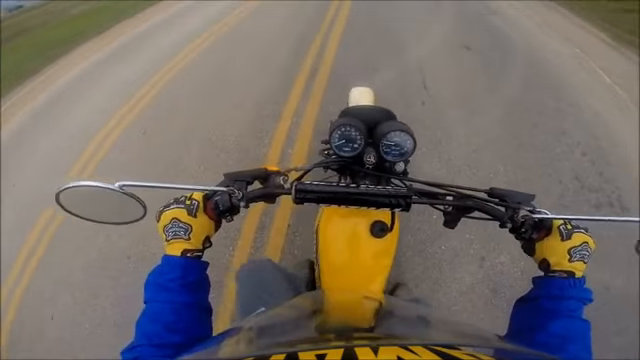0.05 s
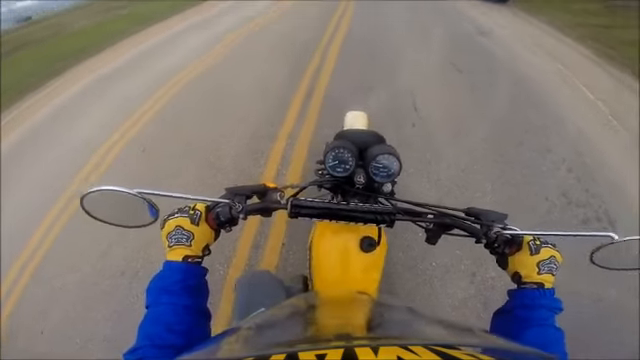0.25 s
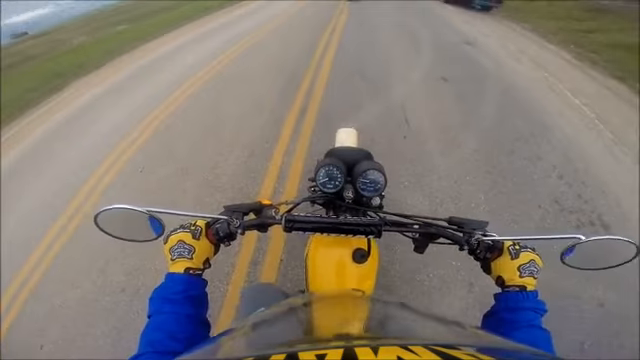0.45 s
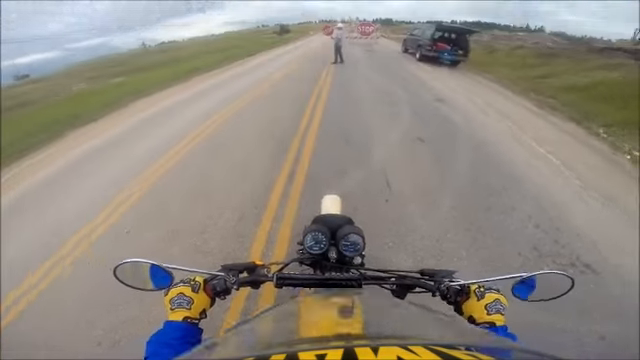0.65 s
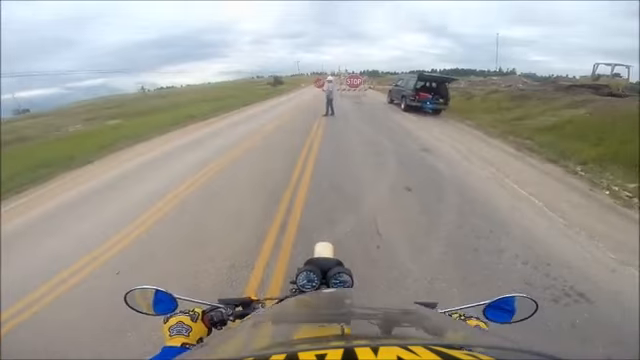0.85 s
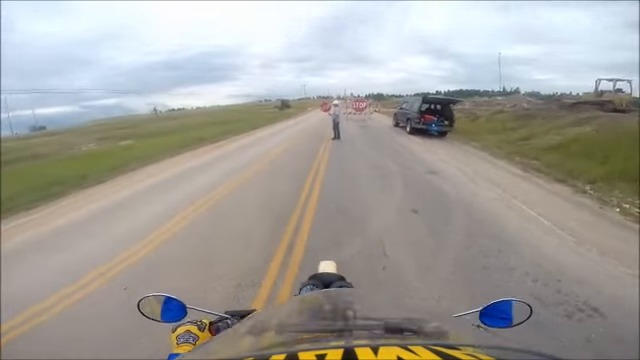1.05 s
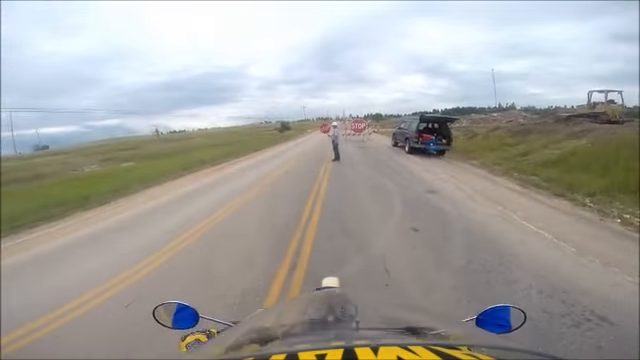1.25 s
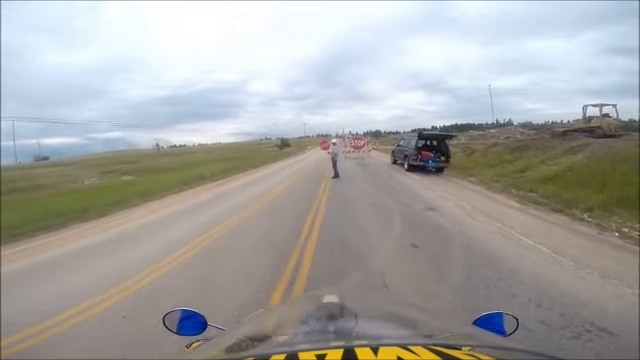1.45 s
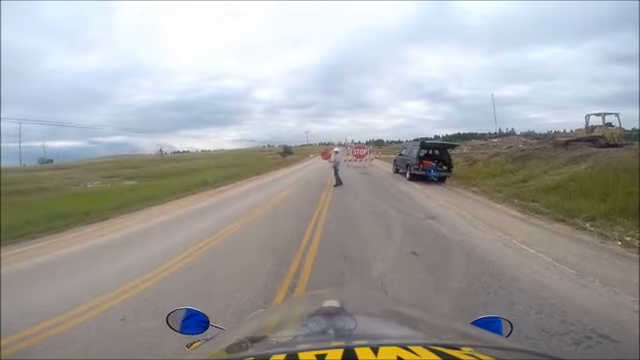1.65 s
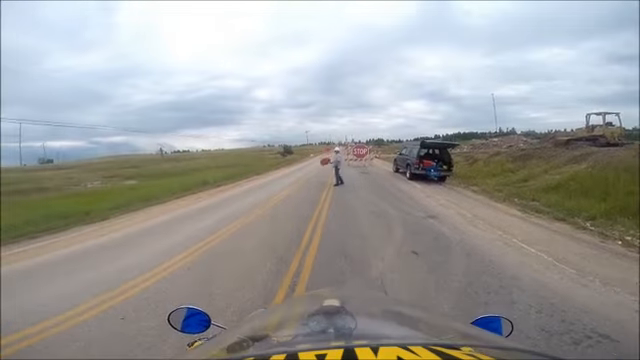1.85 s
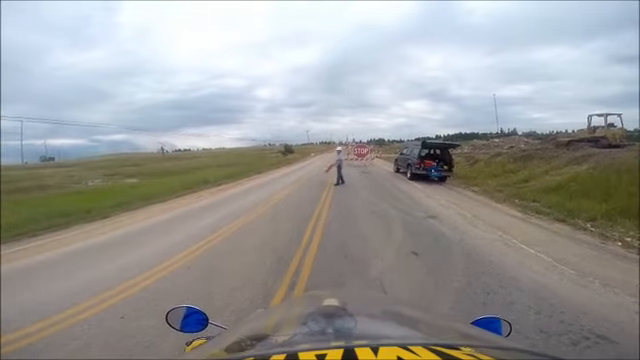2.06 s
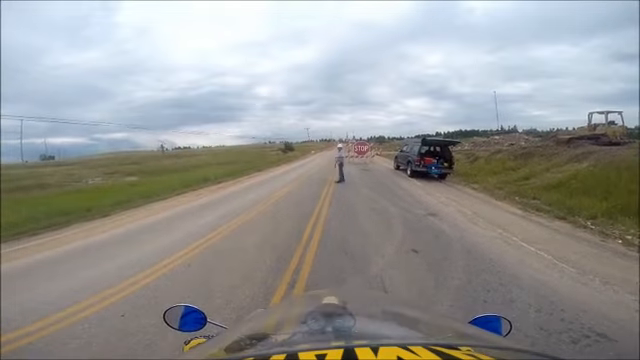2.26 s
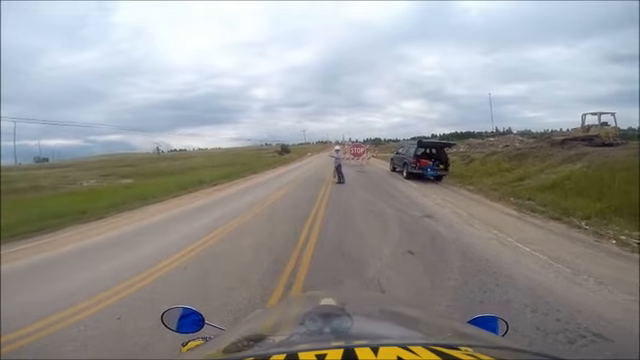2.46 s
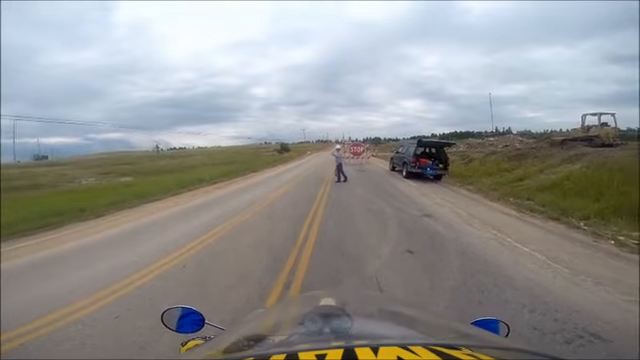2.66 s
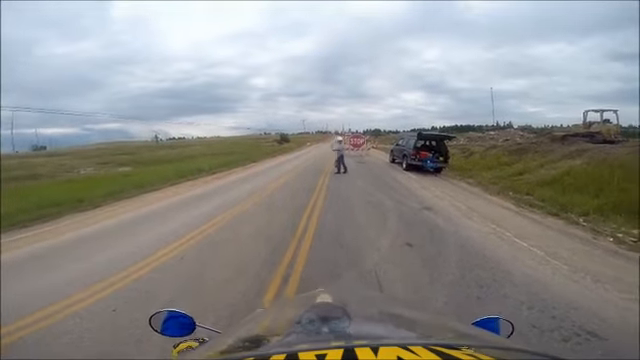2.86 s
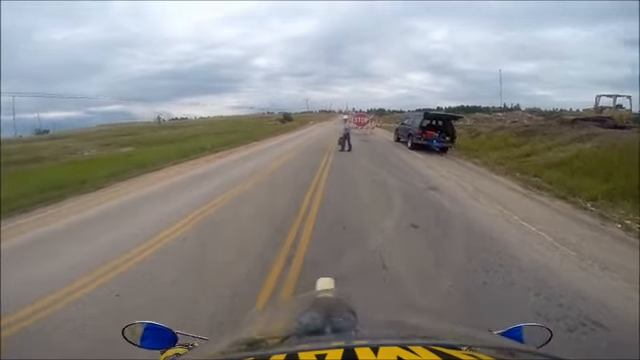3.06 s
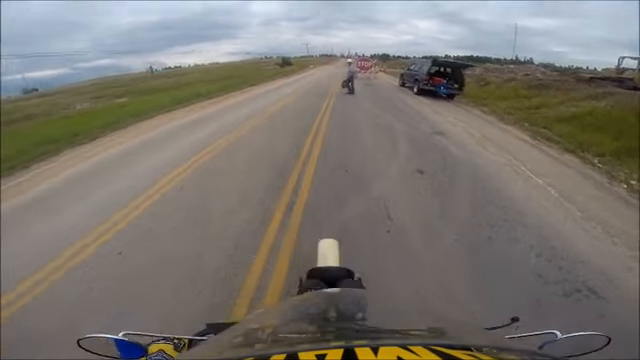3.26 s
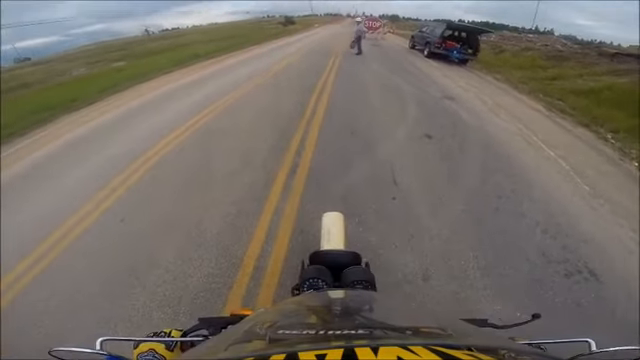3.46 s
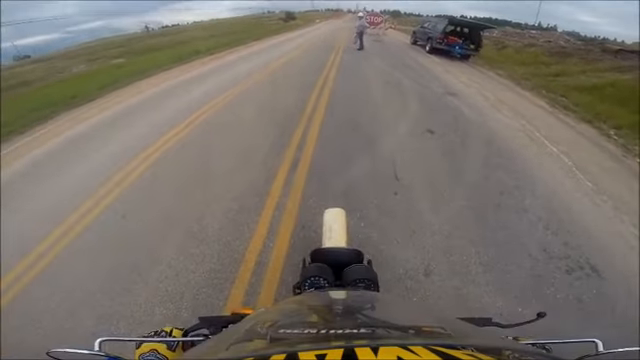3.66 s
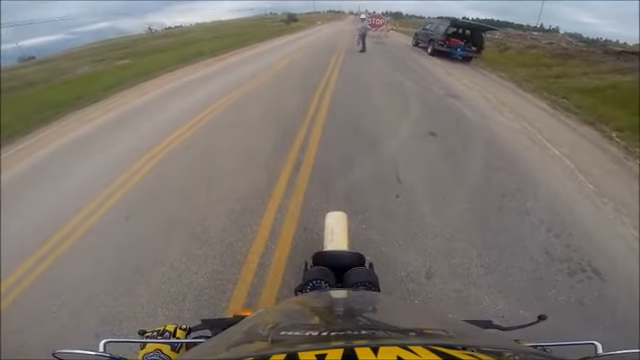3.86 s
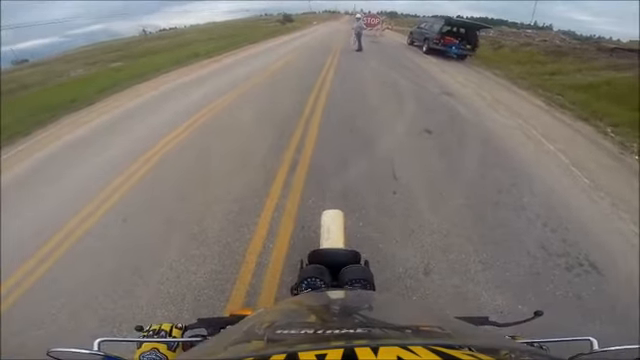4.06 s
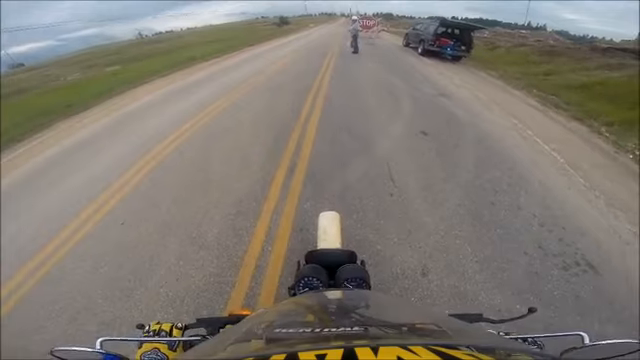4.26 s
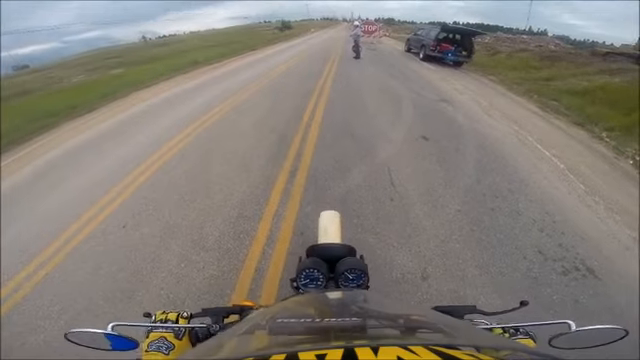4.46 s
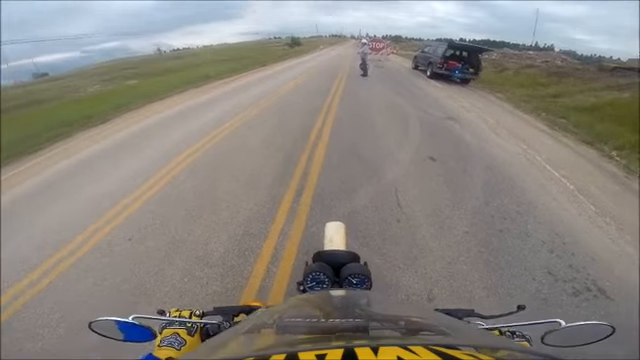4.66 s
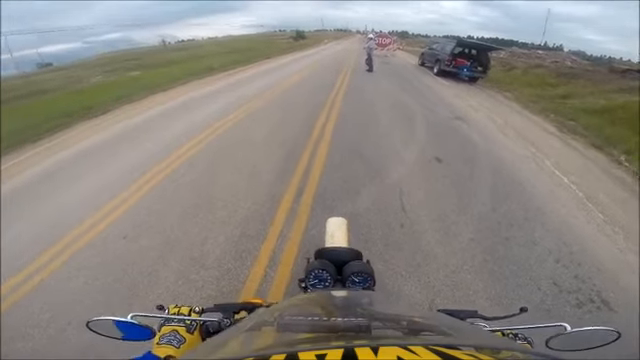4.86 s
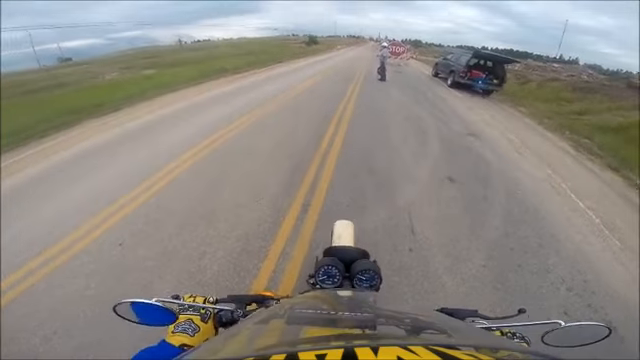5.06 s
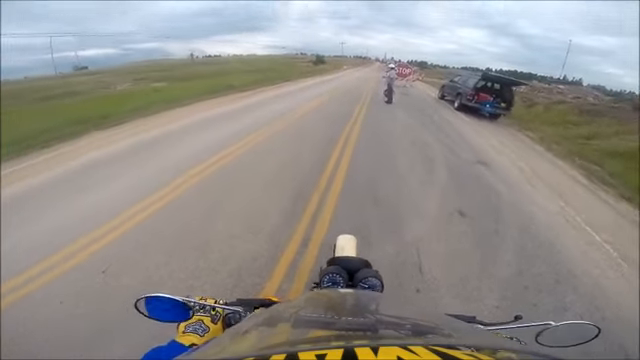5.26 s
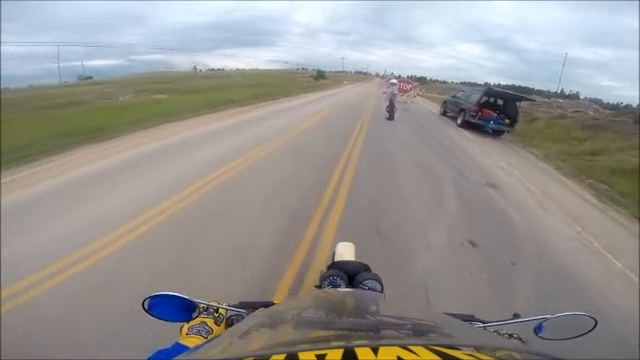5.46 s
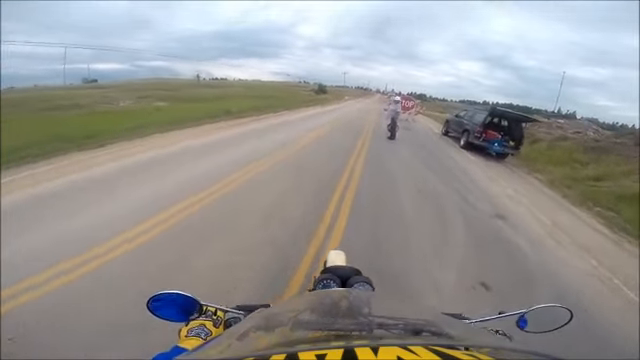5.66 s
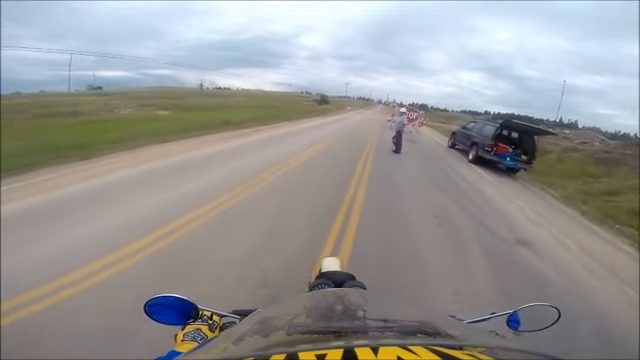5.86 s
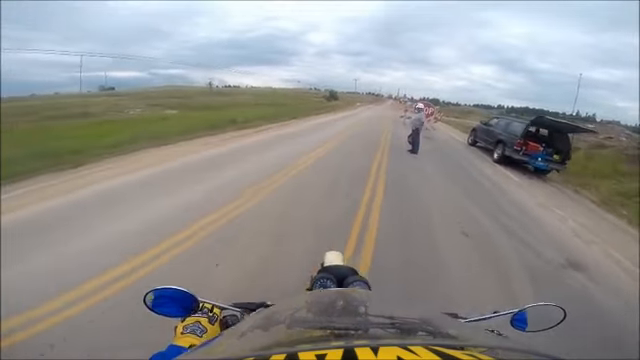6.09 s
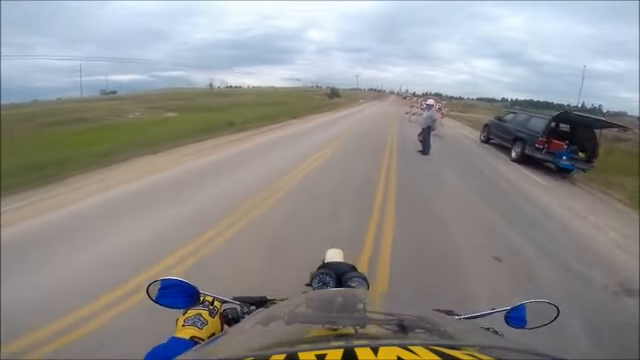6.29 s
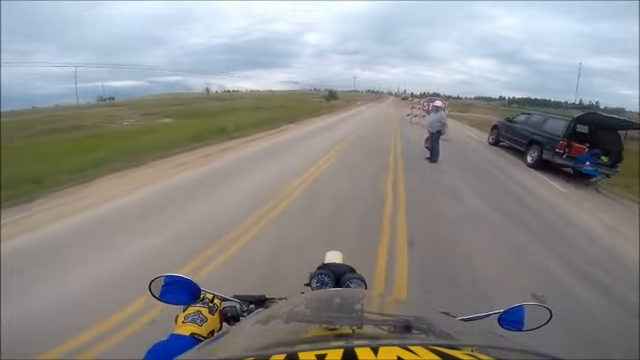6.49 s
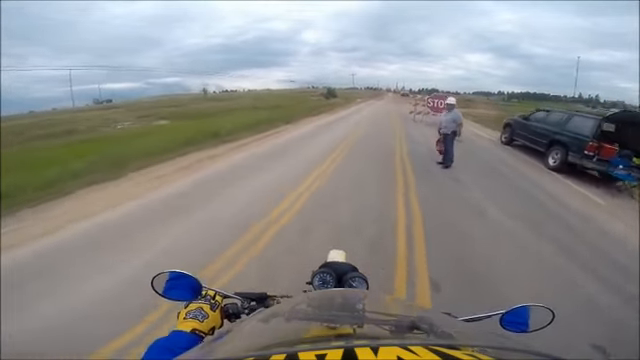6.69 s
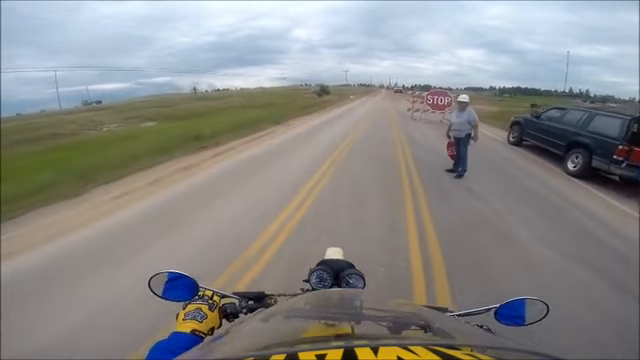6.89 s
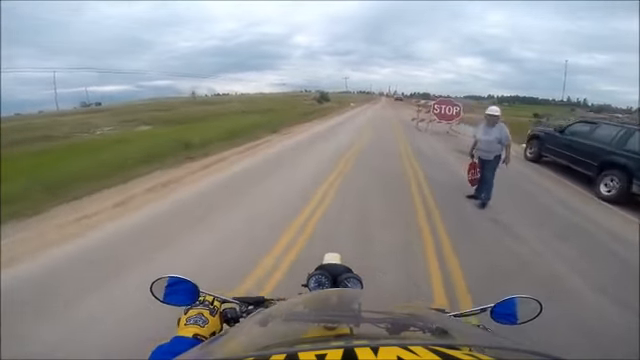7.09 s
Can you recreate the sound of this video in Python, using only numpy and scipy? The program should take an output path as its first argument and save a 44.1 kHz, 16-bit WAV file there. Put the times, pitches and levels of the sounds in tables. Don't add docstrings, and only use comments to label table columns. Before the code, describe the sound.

From a rider's helmet, a two-stroke motorbike putters irregularly at idle, blips up, sags as the clutch bites, and accelerates into a metallic rasp.

```python
import sys
import numpy as np
from scipy import signal
from scipy.fft import rfft, irfft
from scipy.io import wavfile
from scipy.ndimage import uniform_filter1d

SR = 44100
rng = np.random.default_rng(int(sys.argv[2]) if len(sys.argv) > 2 else 0)


def convert_level_to_amplitude(level_db):
    exponent = np.asarray(level_db, float) / 20
    return 10 ** exponent


def to_wav(sig):
    pcm = np.clip(np.atleast_2d(sig), -1, 1) * 32767
    pcm = np.round(pcm).astype(np.int16)
    wavfile.write(sys.argv[1], SR, pcm.T)


N = 314433


def level(x, db):
    return x * convert_level_to_amplitude(db) / np.sqrt(np.mean(x ** 2))


def curves(table):
    s, *columns = np.transpose(table)
    return [np.interp(np.arange(N) / SR, s, c) for c in columns]


def noise(points):
    hz, db = np.transpose(points)
    bins_hz = np.fft.rfftfreq(N, 1 / SR)
    gain = convert_level_to_amplitude(np.interp(np.log(bins_hz + 1), np.log(hz), db))
    return level(irfft(rfft(rng.standard_normal(N)) * gain, N), 0)


def ring(x, hz, width_hz):
    return signal.lfilter(*signal.iirpeak(hz, hz / width_hz, fs=SR), x)


def split(x, hz, kind):
    return signal.sosfilt(signal.butter(4, hz, kind, fs=SR, output="sos"), x)


def swell(at, size, rise_s, fall_s):
    poles = np.exp(-(np.arange(3) / rise_s + 1 / fall_s) / SR)
    sections = [[1, 0, 0, 1, -p, 0] for p in poles]
    jumps = np.bincount(at, size, N)[:N] + 1e-18
    peak = signal.sosfilt(sections, signal.unit_impulse(SR // 10)).max()
    return signal.sosfilt(sections, jumps) / peak


def walk(rate_hz):
    k = int(SR / rate_hz)
    return level(uniform_filter1d(uniform_filter1d(rng.standard_normal(N), k), k), 0)


def even(x):
    return level(x / np.sqrt(uniform_filter1d(x ** 2, SR // 8) + .1), 0)


def bell(at_s, length_s):
    return ((np.arange(N) / SR - at_s) / length_s) ** 2


# start_s, load_state (0 idle, 1 light load, 2 full load)
LOAD_STATE = [
    (4.0, 0),
    (4.3, 1),
    (5.7, 1),
    (6.1, 2),
    (7.13, 2),
]


def share(state):
    return np.clip(1 - abs(curves(LOAD_STATE)[0] - state), 0, 1)


# start_s, rate_turns_per_s
CRANK_SPEED = [(0, 27), (.6, 26), (3.6, 24.8), (3.9, 28.4), (4.04, 32.5), (4.2, 44.2), (4.39, 54.4),
               (4.5, 57.7), (4.69, 50.4), (4.93, 44.8), (5.11, 33.3), (5.23, 30.2), (5.49, 33.0),
               (5.84, 32.3), (6.18, 39.3), (6.54, 43.7), (6.68, 45.0), (7.13, 52.1)]
# start_s, peak_db
CRANK_MARKS = [(5.1405, -47.5), (5.5827, -67), (5.765, -51), (6.3653, -51), (6.5532, -34)]


def crank():
    hz, = curves(CRANK_SPEED)
    firing_s = np.array([row[0] - .003 for row in IDLE_BANGS + REVVED_BANGS + CRANK_MARKS])
    turns = np.cumsum(hz) / SR
    seen = turns[(firing_s * SR).astype(int)]
    whole = np.cumsum(np.round(np.diff(seen, prepend=seen[0] - 2)))
    return hz, turns + np.interp(np.arange(N) / SR, firing_s, whole - seen)


def engine():
    hz, turns = crank()
    at = np.flatnonzero(np.diff(np.floor(turns)) > 0)
    thump, bangs = lone_firings(hz)
    hollow = convert_level_to_amplitude(29.5) * chamber(puffs(at, hz) + thump, hz)
    return hollow + bangs + steady_firing(at) + frame_shake(turns, hz)


PUFF_LEVEL = [-50, -44.5, -42.5]


def puffs(at, hz):
    puff_db = sum(db * share(state) for state, db in enumerate(PUFF_LEVEL))
    puff_db = puff_db + 0.56 * (hz - 42) * share(2.3)
    push = swell(at, convert_level_to_amplitude(puff_db[at] + 0.11 * rng.standard_normal(len(at))), 0.000081, 0.00033)
    flutter = swell(at, np.full(len(at), convert_level_to_amplitude(-66.5)), 0.0044, 0.048) * rng.standard_normal(N)
    return push + flutter * (0.6 + 0.42 * share(0))


# pitch_hz, width_hz, idle_db, light_load_db, full_load_db
CHAMBER_MODES = [(92.8, 13, -11.5, -6, -18), (119, 34, -23, -11, -13), (224, 21, -8, 0, -2),
                 (263, 57.5, -7, -23, -3), (325.9, 41, -0.5, 1.5, 4), (428, 21, -21, -4, -9),
                 (483.5, 19.6, -13.5, -8, -7.5), (635, 20.3, -10, -1, -9), (727.7, 26.4, -13.5, -7.5, -10),
                 (985, 8.5, -16, -1.5, -4.5), (780, 780, -28.5, -19, -29)]


def chamber(push, hz):
    hot = np.clip((hz - 31.5) / 6.8, 0, 1)
    idle = share(0)
    pushes = [push * idle, push * (1 - idle) * (1 - hot), push * (1 - idle) * hot]
    out = 0
    for k, (mode_hz, width_hz, *dbs) in enumerate(CHAMBER_MODES):
        drive = sum(convert_level_to_amplitude(db) * p for db, p in zip(dbs, pushes))
        out = out + (-1) ** k * ring(drive, mode_hz, width_hz)
    return out


def frame_shake(turns, hz):
    shake_db = np.minimum(-51.5 + 19 * np.log2(hz / 42), -51.5)
    judder_db = 14.5 * np.exp(-bell(5.2, .3))
    return convert_level_to_amplitude(shake_db + judder_db + 3.5) * np.sin(2 * np.pi * turns)


# pitch_hz, width_hz, lone_firing_db, light_load_db, full_load_db
METAL_RINGS = [(1079.6, 19, -1, -47, -40), (1229, 10.5, -6, -21, -8.5), (1501, 13, 3.5, -7, -7),
               (1630, 45, -2, -5.5, -10.5), (1940, 12, -11.5, -37, -50), (2057, 15, -5.5, -8, -8),
               (2372, 13, -9.5, -7, -8), (2690, 4.3, -25, -4, -36), (2820, 11, -8.5, -35, -18),
               (2820, 54, -16, -16.5, -16), (3264, 41, -11, -11.5, -42), (3245, 28, -13, -12.5, -32),
               (3938, 46, -22.5, -16.5, -13), (4743, 63, -19, -22, -20), (5500, 16, -49, -16.5, -25),
               (6300, 480, -25, -26, -24), (6390, 230, -32, -31, -30)]


def metal(shake, column):
    return sum((-1) ** k * convert_level_to_amplitude(m[column]) * ring(shake, m[0], m[1]) for k, m in enumerate(METAL_RINGS))


# pitch_hz, level_db (per Hz)
GAS_COLOUR = [(290, -11), (500, -1), (922, -5), (1050, 1), (1300, -3), (1610, 0), (2200, -10.5), (2760, -4),
              (3560, -11), (6390, -25.5), (15000, -44.5)]


def sizzle(envelope, low_hz=4000):
    high_pass = signal.butter(2, low_hz, "high", fs=SR, output="sos")
    return envelope * signal.sosfilt(high_pass, noise(GAS_COLOUR))


# start_s, peak_db, crack_db
IDLE_BANGS = [(0.055, -27, -30), (0.2015, -28, -35), (0.3513, -36.5, -49), (0.5012, -31, -62),
              (0.6173, -37, -54), (0.7726, -32, -37.5), (0.8892, -48, -66), (0.9689, -36, -60),
              (1.0865, -33, -57), (1.2031, -30.5, -47), (1.3872, -39.5, -66), (1.506, -33, -46),
              (1.6604, -29.5, -43), (1.806, -37, -71), (1.9268, -38, -75), (2.043, -33, -44),
              (2.2763, -35.5, -57), (2.476, -41.5, -68), (2.5883, -41.5, -78), (2.7121, -31, -62),
              (2.8783, -44.5, -82), (2.9985, -29.5, -64), (3.1504, -40.5, -68)]
# start_s, peak_db, crack_db
REVVED_BANGS = [(3.439, -30.5, -42), (3.5989, -28.5, -33.5), (3.7528, -29.5, -31.5), (3.859, -29.5, -43),
                (3.962, -29.5, -34.5), (4.026, -25, -29.5), (4.0838, -28.5, -29), (4.134, -28, -28),
                (4.1839, -24, -25), (4.2494, -24.5, -27), (4.3309, -25.5, -27), (4.4236, -26.5, -31),
                (4.5111, -27, -31), (4.6012, -26, -28), (4.6984, -26, -28.5), (4.78, -24, -27.5),
                (4.8643, -28, -37.5), (4.93, -28.5, -40)]
# rate_turns_per_s, level_db
SECOND_BANG = [(43.5, -29), (45.5, -9.5), (55, 0)]
# pitch_hz, width_hz, level_db
STRUCK_FINS = [(2635, 17, -1.5), (2753, 25, 0), (2920, 27, -6)]


def lone_firings(hz):
    s, peak_db, crack_db = np.transpose(IDLE_BANGS + REVVED_BANGS)
    first = ((s - .003) * SR).astype(int)
    again_db = np.interp(hz[first], *np.transpose(SECOND_BANG))
    both = np.r_[first, first + (SR / hz[first]).astype(int)]

    def burst(db, gain_db, rise_s, fall_s):
        return swell(both, convert_level_to_amplitude(np.r_[db, db + again_db] + gain_db), rise_s, fall_s)

    thump_db = -34.5 + 0.43 * (peak_db + 31.5) - 7 * share(1)[first]
    thump = swell(first, convert_level_to_amplitude(thump_db - 14.5), 0.00045, 0.00032)
    envelope = burst(peak_db, 11, 0.003, 0.013)
    gas = convert_level_to_amplitude(-26) * envelope * noise(GAS_COLOUR)
    walls = metal(envelope * rng.standard_normal(N), column=2)
    crack = sizzle(burst(crack_db, -1.0, 0.0066, 0.011))
    fin_db = -3.5 + 0.87 * crack_db + (1 - 0.87) * peak_db
    strike = burst(fin_db, 20.5, 0.0021, 0.0062) * rng.standard_normal(N)
    fins = sum(convert_level_to_amplitude(db) * ring(strike, fin_hz, width_hz) for fin_hz, width_hz, db in STRUCK_FINS)
    return thump, gas + walls + crack + fins


# peak_s, length_s, sway_db, buffeting_db
WIND_GUSTS = [(.24, .08, -58, -46), (0.646, 0.039, -42, -44), (1.004, 0.25, -46, -64),
              (1.33, 0.069, -58, -50), (3.21, 0.14, -43.5, -56), (3.444, 0.032, -57, -36),
              (3.533, .04, -59, -35.5), (3.996, 0.39, -64, -45.5), (4.77, 0.12, -51.5, -59),
              (5.257, .08, -48, -46), (5.487, .1, -43, -43), (6.103, 0.42, -68, -53), (6.83, .05, -51, -62)]


def gusts(calm_db, column):
    return convert_level_to_amplitude(calm_db) + sum(convert_level_to_amplitude(g[column] - 10 * bell(g[0], g[1])) for g in WIND_GUSTS)


def wind():
    sway = even(noise([(2, -17), (5, 7.0), (14, 14.0), (22, -28), (60, -59.5)]))
    buffet = even(noise([(10, -55), (20, 29), (34, -9), (50, -7), (90, -58)]))
    return sway * gusts(-55.5, column=2) + buffet * gusts(-59, column=3)


# start_s, level_db
RUSH_LEVEL = [(0, -46.5), (.4, -46.5), (.85, -51), (1.1, -58.5), (3.06, -61), (3.2, -55), (3.6, -52),
              (4.07, -42.5), (7.13, -44)]


def rush():
    rush_db, = curves(RUSH_LEVEL)
    colour = [(60, -5.0), (110, -4.5), (170, 4.5), (230, -6.5), (420, -3.0), (600, -53.5)]
    return noise(colour) * convert_level_to_amplitude(rush_db - 1) * share(0)


# pitch_hz, level_db (per Hz)
RUNNING_COLOUR = [(24, -45), (40, 8), (146, -2), (325, 0.5), (416, -6.5), (902, -15), (1100, -10),
                  (1410, -18), (1560, -11), (1900, -19.5), (2840, -21), (12000, -49.5), (15400, -54)]


def running_bed():
    return noise(RUNNING_COLOUR) * convert_level_to_amplitude(-53 - 4 * (1 - share(0)) + 1.5 * walk(48))


# start_s, peak_db, pitch_hz
CONTROL_TICKS = [
    (0.49, -51, 4600),
    (2.5194, -72, 8780),
    (2.5594, -76, 4820),
    (2.6294, -68, 6800),
    (3.0475, -56.5, 4870),
    (3.0724, -69, 5870),
]


def ticks():
    out = 0
    for s, db, hz in CONTROL_TICKS:
        burst = swell([int(s * SR)], [convert_level_to_amplitude(db + 6)], 0.00037, 0.0084) * rng.standard_normal(N)
        out = out + ring(burst, hz, hz / 3)
    return out


def swoop():
    at_s = 3.25
    octaves = np.clip(-13.5 * (np.arange(N) / SR - at_s), -3, 3)
    hz = np.clip(120 * 2 ** octaves, 20, 900)
    return convert_level_to_amplitude(-48.5) * np.exp(-bell(at_s, 0.073)) * np.sin(2 * np.pi * np.cumsum(hz) / SR)


# start_s, burn_db, hiss_db (share of the burn that leaves as hiss)
THROTTLE_BURN = [(0, -51, -21), (.8, -59.5, -9), (1.1, -75, -15), (2.9, -73, -13), (3.2, -57.5, -24),
                 (3.6, -59, -12), (4.05, -55, -17), (4.3, -39, -20), (4.55, -43, -19), (4.95, -41.5, -18.5),
                 (5.14, -41, -8), (5.3, -37.5, -4), (5.48, -35, -3), (5.92, -36, -10.5),
                 (6.19, -40.5, -4.5), (6.5, -39.5, -4.5), (6.77, -38, -5), (7.13, -32, -17)]


def steady_firing(at):
    burn_db, leak_db = curves(THROTTLE_BURN)
    hiss_db = burn_db + leak_db
    size = convert_level_to_amplitude(burn_db[at] + 0.73 * rng.standard_normal(len(at)) + 26.5)
    knock = np.bincount(at, size * convert_level_to_amplitude(23), N)
    fresh = swell(at, size * convert_level_to_amplitude(-6), .002, .012)
    turbulence = fresh * rng.standard_normal(N)
    shake = split(knock + .22 * turbulence, 3300, "low") + split(turbulence, 3300, "high")
    rings = metal((1 - share(1.96)) * shake, column=3) + metal(share(2.07) * shake, column=4)
    gas = convert_level_to_amplitude(-28) * sizzle(fresh, low_hz=875)
    hiss_size = convert_level_to_amplitude(hiss_db[at] + 2 * rng.standard_normal(len(at)) + 4.5)
    hiss = sizzle(swell(at, hiss_size, 0.0049, 0.011))
    return rings + singing(at, burn_db) + gas + hiss


# pitch_hz, light_load_db, full_load_db, swell_s, fall_s
PIPE_TONES = [(1076, -10.5, -16.5, 0.0099, 0.018), (1638.6, -1, 1, 0.0035, 0.011),
              (2041, -10, -8, 0.0023, 0.014), (2418, -22, -15, 0.0047, 0.013)]
# start_s, pitch_hz, level_db
CROSS_MODE = [(4.3, 2727, -10), (5.0, 2780, -17), (5.6, 2732, -20), (5.9, 2820, -8), (6.4, 2840, -4),
              (6.7, 2870, -12), (7.13, 2850, -19)]


def singing(at, burn_db):
    tones = []
    for hz, light_db, full_db, rise_s, fall_s in PIPE_TONES:
        gain = share(0.78) * convert_level_to_amplitude(light_db) + share(2) * convert_level_to_amplitude(full_db)
        tones.append((hz, gain, rise_s, fall_s))
    cross_hz, cross_db = curves(CROSS_MODE)
    tones.append((cross_hz, (1 - share(0)) * convert_level_to_amplitude(cross_db), .005, .011))
    out = 0
    for hz, gain, rise_s, fall_s in tones:
        phase = 2 * np.pi * np.cumsum(hz + 3 * walk(20)) / SR
        size = convert_level_to_amplitude(1.2 * rng.standard_normal(len(at)))
        start = phase[at] + .25 * rng.standard_normal(len(at))
        along = swell(at, size * np.cos(start), rise_s, fall_s)
        across = swell(at, size * np.sin(start), rise_s, fall_s)
        out = out + gain * (along * np.sin(phase) - across * np.cos(phase))
    held = convert_level_to_amplitude(-8.5) * np.exp(-bell(5.196, 0.23)) * np.sin(phase)
    return (out + held) * convert_level_to_amplitude(burn_db + 2.5)


def scene():
    air = wind() + rush() + running_bed() + swoop()
    return (engine() + air + ticks())[None]


# pitch_hz, level_db
ELECTRONICS = [(8780, -84.5), (11690, -89), (11719, -101)]


def whine():
    t = np.arange(N) / SR
    return sum(convert_level_to_amplitude(db + 2.5) * np.sin(2 * np.pi * hz * t) for hz, db in ELECTRONICS)


def band_limit(x):
    return signal.sosfilt(signal.butter(12, 15600, fs=SR, output="sos"), x)


def record(dry):
    top_cut = signal.ellip(8, .2, 60, 15000, fs=SR, output="sos")
    return band_limit(signal.sosfilt(top_cut, dry + whine()))


dry = scene()
out = record(dry)
to_wav(out)
```